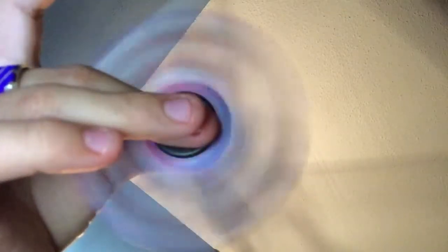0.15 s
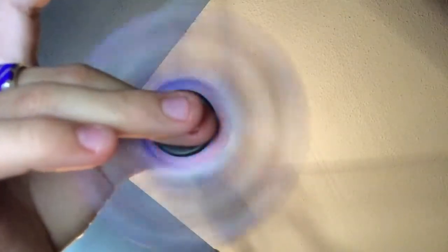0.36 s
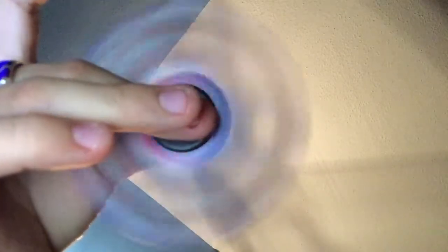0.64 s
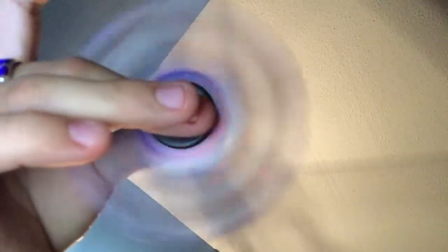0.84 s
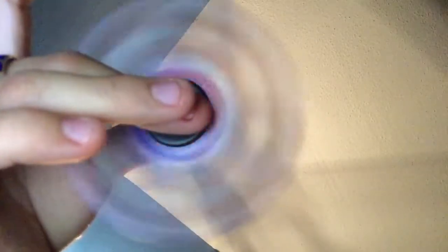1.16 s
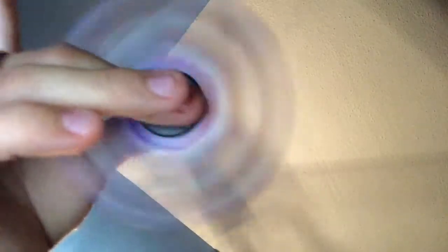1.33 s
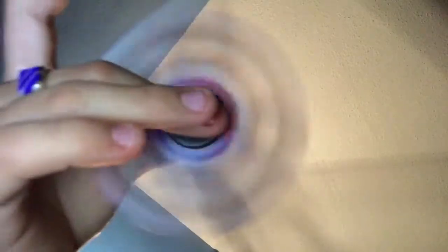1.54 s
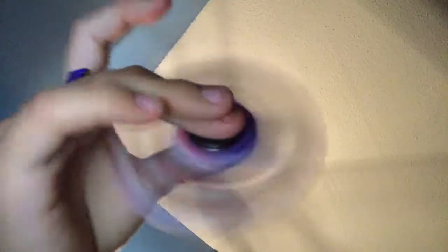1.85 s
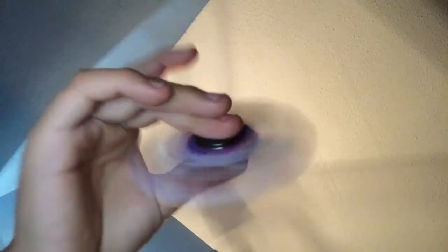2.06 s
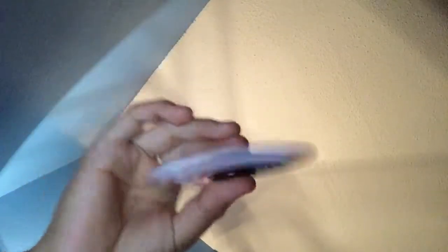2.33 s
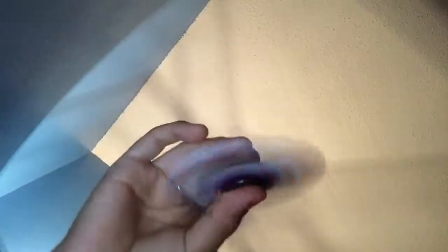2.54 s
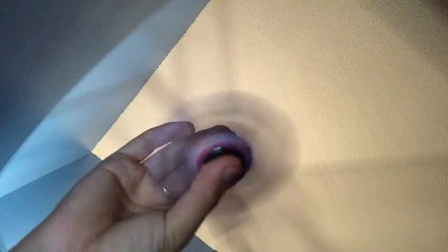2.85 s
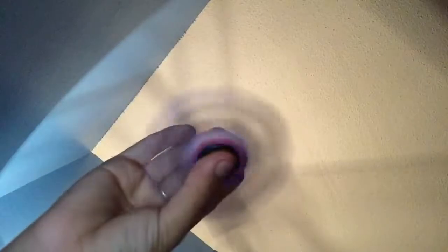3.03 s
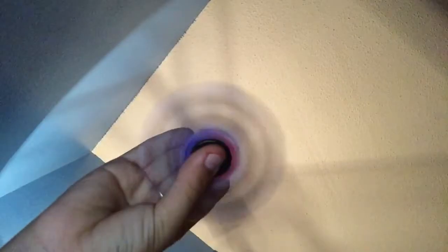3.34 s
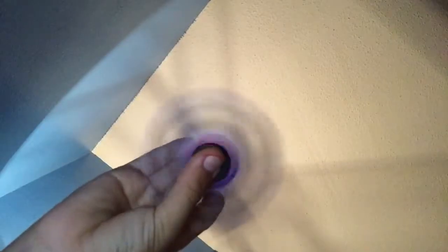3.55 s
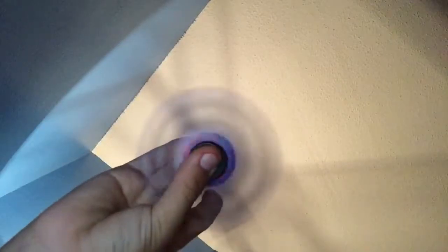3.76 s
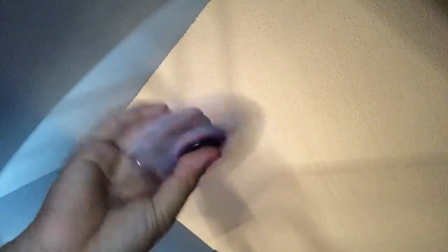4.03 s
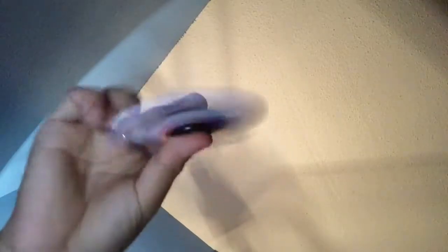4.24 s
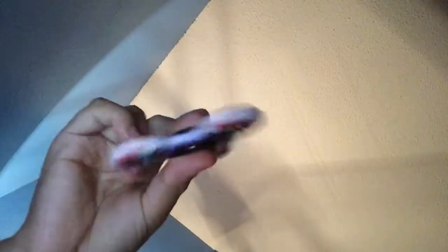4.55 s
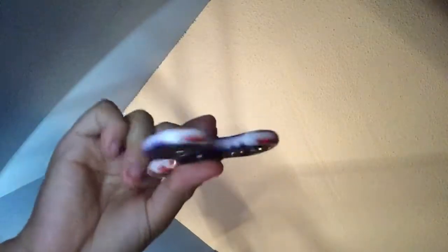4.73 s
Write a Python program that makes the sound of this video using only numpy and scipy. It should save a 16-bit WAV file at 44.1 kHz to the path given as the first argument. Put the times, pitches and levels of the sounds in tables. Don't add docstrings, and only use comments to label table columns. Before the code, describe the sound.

Close mono pickup in a quiet room. Steel balls roll in a hand-held spinner, making a steady high metallic whir full of fine crackling ticks and faint ringing tones. It weakens as the hand moves back and turns, throbbing more strongly for a moment. Finally finger contact makes quick slaps, skin scuffs and two dull little thuds; the spinning cuts out and only soft rumble and hush remain.

```python
import sys
import numpy as np
from scipy import signal
from scipy.fft import rfft, irfft, next_fast_len
from scipy.io import wavfile
from scipy.ndimage import uniform_filter1d, map_coordinates

SR = 44100
rng = np.random.default_rng(int(sys.argv[2]) if len(sys.argv) > 2 else 0)


def wrap_up_sound(samples):
    columns = np.atleast_2d(samples).T
    tamed = np.clip(columns, -1, 1)
    steps = np.round(tamed * 32767).astype(np.int16)
    wavfile.write(sys.argv[1], SR, steps)


def to_linear_factor(level_db):
    exponent = np.asarray(level_db, float) / 20
    return 10 ** exponent


N = 215499
TIME_S = np.arange(N) / SR
WANDER_HZ = 70


def spinner():
    # t/s, speed/(turns per s), throb once, twice and three times a turn (each level/dB)
    spin = [(0, 13.1, 0.35, 0.31, 1.1), (.6, 15.5, 0.45, 0.24, 0.67), (.85, 11.4, 0.33, 0.36, 2.7),
            (1.4, 13.7, 0.57, 0.25, 1.8), (1.8, 15, 0.27, 0.33, 0.83), (2.2, 12.7, 0.33, 2.4, .4),
            (2.55, 10.7, 0.38, 1.7, .4), (2.9, 13, 0.46, 0.37, 0.51), (3.55, 9.6, 0.39, 0.4, 0.76),
            (4.2, 9.3, 0.35, 0.31, 0.43), (4.75, 3.1, 0.41, 0.32, 0.46)]
    speed, once_db, twice_db, thrice_db = curves(spin)
    turn = 2 * np.pi * np.cumsum(speed) / SR
    throb_db = once_db * np.sin(turn + 0.32)
    throb_db += twice_db * np.sin(2 * turn + 0.2)
    throb_db += thrice_db * np.sin(3 * turn + 0.24)
    load_db = 0.6 * wobble(45)
    common = rolling(2500, scatter_db=4.0, smooth=0.51)
    fade = np.interp(TIME_S, [4.7, 4.76], [1, 0])

    def part(level_db, modes, mid_hz, span_hz, own, flutter_db, throb):
        own_force = rolling(2000, scatter_db=3.0, smooth=0.6)
        force = np.sqrt(1 - own) * common + np.sqrt(own) * own_force
        flutter = flutter_db * (0.27 * wobble(18) + wobble(50))
        swing = to_linear_factor(load_db + throb * throb_db + flutter)
        return to_linear_factor(level_db) * fade * unit(swing * rung(force, modes, mid_hz, span_hz))

    edge, level = levels()
    return cage(part, level) + races(part, level) + finger_cap(part, level, edge) + body(part, level)


def cage(part, level):
    # f/Hz, width/Hz, level/dB
    tones = [(5340, 920, -5.5), (5710, 320, -7), (6530, 410, -0.5)]
    # f/Hz, width/Hz, level/dB
    fine_tones = [(4965, 45, 0), (5250, 45, 1), (5572, 40, 0), (5878, 45, 1), (5980, 35, 0), (6212, 40, -3),
                  (6420, 45, 1), (6492, 40, 0), (6895, 45, 0)]
    low_db, high_db = level["cage_low"], level["cage_high"]
    low = part(low_db, tones[:1], 5350, 2200, own=0.29, flutter_db=1.0, throb=0.81)
    high = part(high_db, tones[1:], 6270, 2400, own=0.43, flutter_db=-0.8, throb=0.13)
    fine_db = (low_db + high_db) / 2 + 6.5 - 9
    fine = part(fine_db, fine_tones, 5500, 4000, own=1.0, flutter_db=-4.0, throb=0.25)
    return slid(low, WANDER_HZ * wobble(3)) + slid(high, WANDER_HZ * wobble(3)) + fine


def races(part, level):
    # f/Hz, width/Hz, level/dB
    outer_tones = [(7054, 180, -0.5), (7324, 144, -5), (7380, 320, -13.5)]
    inner_tones = [(9080, 110, 3), (9474, 180, 6.5), (9534, 270, 6), (10420, 210, -4), (10710, 110, -3.5),
                   (10970, 490, -6.5), (11520, 540, -5.5)]
    ball_tones = [(12600, 1600, -12), (15600, 380, -7)]
    # t/s, ring f/Hz, level over its usual/dB
    pitch = [(0, 7060, 4.5), (.56, 7150, -2.5), (.72, 7060, -2), (1.0, 7150, 1.5), (1.12, 7080, 0),
             (1.4, 7160, 0.5), (1.8, 7070, -0.5), (2.05, 7100, -1), (2.4, 7170, 1), (2.75, 7270, -1.5),
             (2.88, 7060, 0.5), (3.15, 7120, 3), (3.55, 7160, 0), (3.9, 7150, -0.5), (4.3, 7120, 0.5),
             (4.53, 7170, 2), (4.61, 7270, -1), (4.74, 7320, -1)]
    outer_hz, load_db = curves(pitch)
    outer = part(level["outer"] + load_db, outer_tones, 7435, 760, own=0.58, flutter_db=0.95, throb=0.4)
    inner = part(level["inner"], inner_tones, 10550, 4100, own=0.96, flutter_db=1.2, throb=0.38)
    balls = part(level["balls"], ball_tones, 16500, 8800, own=0.93, flutter_db=1.0, throb=0.45)
    return slid(outer, outer_hz - 7150) + slid(inner, WANDER_HZ * wobble(2)) + balls


def finger_cap(part, level, edge):
    # f/Hz, width/Hz, level/dB
    cap_tones = [(2009, 81, 0)]
    dull_tones = [(880, 880, 0)]
    gripped_tones = [(2450, 3900, 0)]
    # t/s, ring f/Hz, ring over the dull shake/dB
    squeeze = [(0, 1960, 2), (.2, 1930, -6), (.45, 1937, -3), (.62, 1940, -3), (.78, 1975, -2.5),
               (1.45, 1983, -0.5), (1.6, 1983, -2.5), (1.85, 1974, -1.5), (1.97, 1980, 5), (2.14, 1978, -7),
               (2.3, 1967, -8.5), (3.95, 1935, -10.5), (4.15, 1930, 1.5), (4.35, 1886, 0),
               (4.44, 1900, -14), (4.475, 1905, 5), (4.51, 1890, -9), (4.76, 1960, -9)]
    cap_hz, ring_db = curves(squeeze)
    cap_db = level["cap"]
    ring = part(cap_db + 0.75 * ring_db, cap_tones, 1765, 720, own=0.77, flutter_db=0.2, throb=0.28)
    dull_db = cap_db - 2.5 + 0.01 * ring_db - 5.0 * edge
    dull = part(dull_db, dull_tones, 1030, 2200, own=0.96, flutter_db=1.0, throb=0.37)
    regrip_db = 14 * np.exp(-((TIME_S - 4.7) / .17) ** 2)
    gripped_db = cap_db - 12 - 0.53 * ring_db + 6 * edge + regrip_db
    gripped = part(gripped_db, gripped_tones, 2390, 1400, own=1.0, flutter_db=1.5, throb=0.55)
    return slid(ring, cap_hz - 1980) + dull + gripped


def body(part, level):
    # f/Hz, width/Hz, level/dB
    arm_tones = [(3010, 580, -1), (3480, 144, 0.5), (3816, 207, 5)]
    hub_tones = [(4020, 300, -1.2), (4500, 320, 0)]
    weight_tones = [(7560, 260, -5), (8115, 110, -2), (8330, 260, -7), (8680, 230, -5)]
    arms = part(level["arms"], arm_tones, 3280, 1290, own=1.0, flutter_db=1.94, throb=0.24)
    hub = part(level["hub"], hub_tones, 4530, 1100, own=0.72, flutter_db=1.6, throb=1.44)
    weights = part(level["weights"], weight_tones, 8240, 1400, own=0.65, flutter_db=1.0, throb=0.22)
    return arms + slid(hub, WANDER_HZ * wobble(2.7)) + slid(weights, WANDER_HZ / 2 * wobble(2))


def levels():
    # t/s, nearness level/dB, how far the disc is turned edge-on (0-1), lean of the axle (-1 to 1)
    pose = [(0, 0.5, 0.3, 0.48), (.5, 1, 0.04, -0.11), (1.0, -0.5, 0.1, 0.49), (1.46, 0, 0, -0.21),
            (1.56, -3.5, 0, 0.21), (1.72, -3.5, 0.06, 0.64), (1.77, -5, 0.28, 0.26),
            (2.03, -7.5, 0.35, -0.51), (2.25, -5.5, 0.96, 0.07), (2.6, -6.5, 1.1, 0.77),
            (2.8, -8.5, 0.93, 0.7), (2.9, -7, 0.76, 1), (3.15, -8, 0.63, 0.63), (3.36, -7, 0.01, -.4),
            (3.88, -8, 0.14, -0.8), (4.18, -12, 0.44, -0.53), (4.22, -6.5, 0.77, 0.22),
            (4.45, -11.5, 0.6, 0.51)]
    # start t/s, end t/s, tightness (0-1)
    seated = [
        (0.82, 1.24, 0.75),
        (1.444, 1.718, .6),
        (3.955, 4.19, 0.37),
    ]
    # start t/s, end t/s, level/dB
    loose = [
        (1.253, 1.45, 1.5),
        (4.06, 4.47, 2),
    ]
    # t/s, level/dB
    rattles = [(.03, -1.5), (.1, -4.5), (.16, 0), (.27, 2), (.45, 0), (.69, 4), (.755, -2), (.9, 1),
               (.945, 1.5), (.785, 2.5), (1.11, -1), (1.18, -2), (1.31, 4), (1.41, 5), (1.46, 2.5),
               (1.537, 2), (1.587, 3.5), (1.62, 4), (1.7, 1.5), (1.735, 2), (2.27, 3.5), (2.56, 5),
               (2.85, 4), (2.915, -2), (3.03, -1), (3.145, -3), (3.29, 0), (3.345, 2), (3.37, 2),
               (3.44, 2.5), (3.52, 3), (3.6, 2), (3.62, 3.5), (3.68, 1), (3.705, 3.5), (3.75, 2),
               (3.855, 7), (3.9, 3), (4.235, 4.5), (4.265, 4), (4.295, 5), (4.325, 2.5), (4.35, 2.5),
               (4.38, 3), (4.41, 4.5), (4.456, 3), (4.489, 4), (4.522, 4.5), (4.548, -2), (4.578, 6),
               (4.59, 3), (4.601, 8.5), (4.622, 10), (4.65, 13), (4.663, 15), (4.68, 5), (4.715, 3)]
    # level/dB, share of nearness, edge-on/dB, lean/dB, seated/dB, share of rattle
    answers = dict(cage_low=(-53, 1, -5, 4.5, 1.5, 1.5), cage_high=(-54, 1, -2, -4.5, 3.5, -0.8),
               outer=(-49.5, 0.83, -2, -1.5, 0, 0.98), inner=(-64, 0.53, -0.5, -1, -6, 0.5),
               balls=(-70.5, 0.53, 0, 0.5, 5.5, 1.3), cap=(-67, 0.69, 0.7, -0.5, 1.2, -0.8),
               arms=(-63.5, 0.49, -1.3, 2.2, -6.5, 1.5), hub=(-61, 1, 6, -0.5, -4, 1.56),
               weights=(-65.5, 0.5, 5, 1, -1.5, -0.5))
    stops = dict(cage_low=1.7, cage_high=1.8, outer=1.35, inner=1.5, balls=1.3, cap=2, arms=2.2, hub=2.1, weights=2.3)
    settle_s = 0.025
    near_db, edge, lean = curves(pose)
    seat = np.array(seated)[:, 2] @ spells(seated, settle_s, TIME_S)
    rattle_db = swells(rattles, width_s=0.005)
    brake_db = 170 * (TIME_S - 4.553).clip(0)
    level = {}
    for name, (db, near, edge_db, lean_db, seat_db, shake) in answers.items():
        pose_db = near * near_db + edge_db * edge + lean_db * lean
        level[name] = db + pose_db + seat_db * seat + shake * rattle_db - stops[name] * brake_db
    drag_db = 25 * (TIME_S - 4.34).clip(0)
    level["balls"] += drag_db
    level["inner"] += 0.44 * drag_db
    level["arms"] -= 1.7 * drag_db
    level["arms"] += 2.5 * (1 - np.tanh((TIME_S - 0.72) / settle_s)) / 2
    level["arms"] += 3.5 * np.exp(-(TIME_S / 0.16) ** 2)
    level["inner"] += np.array(loose)[:, 2] @ spells(loose, settle_s / 2, TIME_S)
    return edge, level


def rolling(rate, scatter_db, smooth):
    chance, size, sign = rng.random((3, N))
    strength = to_linear_factor(-scatter_db * np.log(1 - size).clip(-3.5))
    knocks = (chance < rate / SR) * strength * np.sign(sign - .5)
    share = np.clip(smooth, 0, 1)
    return np.sqrt(1 - share) * unit(knocks) + np.sqrt(share) * rng.standard_normal(N)


def rung(force, modes, mid_hz, span_hz):
    def response(f):
        ring = 0
        for k, (centre, width, db) in enumerate(modes):
            tone = 1j * f * width / (centre * centre - f * f + 1j * f * width)
            ring = ring + (-1) ** k * to_linear_factor(db) * tone
        band = (1j * f * span_hz / (mid_hz ** 2 - f * f + 1j * f * span_hz)) ** 2
        return ring * band
    return unit(filtered(force, response))


def ball_knocks():
    # t/s, peak level/dB
    near_knocks = [(0.0055, -33), (0.1072, -33), (0.1615, -33), (0.1975, -33), (0.2151, -33), (0.2216, -33),
                   (0.2244, -34), (0.267, -30), (0.3183, -33), (0.3195, -35), (0.3895, -33), (0.3914, -33),
                   (0.423, -30), (0.4503, -33), (0.4736, -32), (0.5166, -30), (0.5458, -34), (0.5543, -34),
                   (0.5556, -35), (0.5574, -35), (0.6319, -34), (0.6405, -34), (0.6777, -34), (0.6798, -35),
                   (0.751, -35), (0.7561, -35), (0.7579, -31), (0.7652, -35), (0.7812, -34), (0.7948, -28),
                   (0.8087, -34), (0.826, -34), (0.8433, -34), (0.8575, -34), (0.8747, -35), (0.8836, -33),
                   (0.8849, -31), (0.9149, -33), (0.944, -30), (0.9555, -32), (0.9747, -31), (1.0161, -34),
                   (1.0186, -33), (1.0208, -34), (1.0247, -33), (1.0461, -33), (1.068, -33), (1.0723, -33),
                   (1.0798, -32), (1.0898, -32), (1.0991, -31), (1.1041, -30), (1.111, -33), (1.1123, -31),
                   (1.1493, -34), (1.1509, -32), (1.1567, -33), (1.158, -31), (1.1594, -34), (1.1661, -33)]
    far_knocks = [(1.2339, -34), (1.2369, -34), (1.2415, -34), (1.2458, -34), (1.2723, -31), (1.3009, -32),
                  (1.3042, -31), (1.3071, -33), (1.3292, -34), (1.4088, -32), (1.4102, -32), (1.4402, -32),
                  (1.4645, -31), (1.5363, -34), (1.5754, -36), (1.5872, -33), (1.6119, -35), (1.648, -36),
                  (1.6988, -35), (1.7028, -36), (1.7043, -37), (1.7122, -36), (1.7278, -37), (1.7365, -37),
                  (1.7399, -38), (1.7651, -38), (1.8402, -38), (1.8714, -38), (1.9555, -39), (1.957, -41),
                  (1.978, -41), (2.0833, -42), (2.0944, -39), (2.1082, -38), (2.1663, -41), (2.1734, -42),
                  (2.1785, -39), (2.2122, -40), (2.2536, -37), (2.2549, -39), (2.2637, -39), (2.3087, -40),
                  (2.342, -40), (2.3653, -41), (2.368, -38), (2.4024, -40), (2.4382, -41), (2.4473, -39),
                  (2.5428, -40), (2.5475, -39), (2.6076, -40), (2.6147, -41), (2.65, -40), (2.6588, -41),
                  (2.7351, -43), (2.7395, -43), (2.7406, -43), (2.7451, -43), (2.8417, -42), (2.8468, -42)]
    last_knocks = [(2.9104, -40), (2.9144, -40), (2.9167, -41), (2.9225, -41), (2.9266, -42), (2.9559, -40),
                   (2.9997, -40), (3.0327, -40), (3.0341, -40), (3.1343, -42), (3.136, -42), (3.1376, -40),
                   (3.1432, -39), (3.1466, -38), (3.1488, -42), (3.1591, -40), (3.2224, -41), (3.2241, -41),
                   (3.2291, -41), (3.2332, -41), (3.2651, -41), (3.27, -41), (3.2796, -39), (3.3413, -37),
                   (3.3516, -40), (3.3671, -37), (3.3881, -39), (3.5203, -39), (3.5891, -40), (3.6174, -39),
                   (3.7404, -40), (3.746, -40), (3.7479, -41), (3.8276, -41), (3.829, -40), (3.8927, -41),
                   (3.8941, -41), (3.8956, -41), (3.9023, -41), (3.9101, -41), (3.9142, -41), (4.0234, -41),
                   (4.1767, -43), (4.2217, -38), (4.2238, -43), (4.2306, -39), (4.234, -39), (4.2371, -42),
                   (4.2638, -39), (4.2945, -40), (4.2967, -40), (4.2993, -38), (4.3084, -42), (4.3464, -42),
                   (4.3491, -43), (4.3518, -43), (4.4135, -42), (4.4218, -43), (4.4538, -43), (4.459, -43)]
    width_s = .00019
    out = np.zeros(N + SR)
    t = np.arange(SR // 100) / SR
    u = t - 4 * width_s
    for s, db in near_knocks + far_knocks + last_knocks:
        hz = rng.normal(6000, 250)
        ring = np.cos(2 * np.pi * hz * u) * np.exp(-.5 * (u / width_s) ** 2)
        out[round((s - 4 * width_s) * SR):][:len(t)] += to_linear_factor(db - 2) * ring
    return out[:N]


def arm_brushes():
    # t/s, peak level/dB, colour f/Hz, bright edge against the peak/dB
    brushes = [(4.4945, -33, 5200, -23), (4.5286, -40, 4900, -21), (4.5676, -48, 6000, -8),
               (4.578, -49, 5500, -10), (4.5475, -50, 5000, -16), (4.5605, -51, 5200, -14),
               (4.5905, -54, 4600, -14), (4.6005, -51, 5400, -12), (4.6231, -54, 5600, -4),
               (4.6505, -64, 7200, 3), (4.6629, -60, 6000, -13), (4.6968, -65, 7200, -8),
               (4.7144, -63, 6600, 4)]
    out = np.zeros(N + SR)
    t = np.arange(SR // 100) / SR
    for s, db, hz, edge_db in brushes:
        ring = pulse(t, hz, .00015)
        edge = pulse(t, 13500, .0001)
        out[round(s * SR) - 7:][:len(t)] += to_linear_factor(db) * (ring + to_linear_factor(edge_db) * edge)
        hiss = unit(np.diff(rng.standard_normal(len(t) + 1)))
        scuff = hiss * to_linear_factor(-60 * t / 0.012) * np.sin(np.pi * t / t[-1])
        out[round(s * SR) - 60:][:len(t)] += to_linear_factor(db + edge_db + 2) * scuff
    return out[:N]


def thuds():
    # t/s, level/dB
    pushes = [
        (4.567, -50),
        (4.621, -54),
    ]
    click_s = .0003
    out = np.zeros(N + SR)
    t = np.arange(SR // 10) / SR
    for s, db in pushes:
        push = to_linear_factor(3 - 60 * t / .03) * np.sin(2 * np.pi * 240 * t)
        dull_noise = signal.lfilter(*signal.butter(2, 420, fs=SR), rng.standard_normal(len(t)))
        rub = to_linear_factor(-9.5 - 60 * t / 0.14) * unit(dull_noise)
        out[round(s * SR):][:len(t)] += to_linear_factor(db) * (push + rub) * (1 - np.exp(-t / 0.00047))
        out[round((s - 2 * click_s) * SR):][:len(t)] += to_linear_factor(db - 9) * pulse(t, 2500, click_s)
    return out[:N]


def near_echoes(x, patchy_db):
    # start t/s, end t/s, first delay/ms, last delay/ms, strength
    mirrors = [(0, .2, 1.19, 1.19, .15), (.2, .6, .545, .545, .1), (.2, .6, 1.06, 1.055, -.12),
               (.2, .6, 1.455, 1.46, .12), (.6, 1.2, .83, .82, .13), (.8, 1.2, .6, .59, .13),
               (.8, 1.2, 1.7, 1.7, -.12), (1.6, 2.2, 1.37, 1.37, -.12), (1.8, 2.6, 1.188, 1.188, .16),
               (3.0, 3.6, 1.185, 1.19, .16), (1.7, 3.2, 1.825, 1.74, .19), (3.2, 4.2, 1.72, 1.69, .12),
               (2.6, 3.4, .41, .415, .13), (3.2, 3.6, .76, .755, .07), (2.8, 3.8, 1.5, 1.455, -.13),
               (4.0, 4.6, .948, .955, -.13), (4.2, 4.6, 1.205, 1.185, .13)]
    hz, t, z = signal.stft(x, SR, nperseg=512, noverlap=384)
    comb = np.ones(z.shape, complex)
    for facing, (start, end, first_ms, last_ms, strength) in zip(spells(mirrors, .1, t), mirrors):
        delay = np.interp(t, [start, end], [first_ms, last_ms]) / 1000
        on = facing > 1e-3
        comb[:, on] += strength * facing[on] * np.exp(-2j * np.pi * hz[:, None] * delay[on])
    streaks = uniform_filter1d(rng.standard_normal(z.shape), size=2, axis=0)
    streaks = uniform_filter1d(streaks, size=26, axis=1)
    streaks = streaks - uniform_filter1d(streaks, size=9, axis=0)
    echoed = z * comb * to_linear_factor(patchy_db * unit(streaks))
    return signal.istft(echoed, SR, nperseg=512, noverlap=384)[1][:N]


def room():
    # f/Hz, level/dB per Hz
    low = [(12, -58), (20, -50), (49, -1), (85, -3), (108, 2), (140, -5), (220, -27), (400, -120)]
    upper = [(110, -120), (150, 0), (200, -3), (330, -8.5), (430, -10), (730, -120)]
    air = [(120, -21.5), (200, -4.5), (438, -18), (587, -16.5), (1090, -22.5), (1410, -20), (2070, -26),
           (2700, -27.5), (6500, -30), (15700, -34.5)]
    # t/s, level over the rumble/dB
    bumps = [(0.09, 2), (0.22, 5), (0.29, 4), (0.4, 5), (0.52, 6), (0.61, 7), (0.72, 4.5), (0.86, 10),
             (0.91, 2.5), (1.1, 8), (1.27, 7), (1.66, 13.5), (1.82, 7), (1.97, 9), (2.32, 6), (2.5, 4),
             (2.6, 13), (2.82, 5), (3.02, 6), (3.18, 4), (3.23, 1), (3.32, 6), (3.4, 2), (3.55, 3),
             (3.74, 9), (3.88, 3.5), (4.01, 10.5), (4.1, 10), (4.23, 9), (4.28, 5), (4.36, 1), (4.44, 6),
             (4.58, 4.5), (4.77, 5)]
    # t/s, level over their murmur/dB
    taps = [(.17, 0), (.78, 8), (1.05, 3.5), (1.81, -1), (2.11, 11.5), (2.16, 9), (2.24, 10), (2.32, 9),
            (2.59, 8.5), (2.68, 9), (3.12, 4), (3.18, 1), (3.31, 6), (3.79, 8.5), (4.08, 8)]
    lumps = to_linear_factor(1.3 * wobble(24.83))
    rumble = to_linear_factor(-65 + 1.08 * swells(bumps, width_s=0.021)) * unit(lumps * coloured(low))
    murmur = to_linear_factor(-76 + 1.3 * swells(taps, width_s=0.014) + 1.6 * wobble(20)) * coloured(upper)
    hush = to_linear_factor(-69 + 0.46 * wobble(4.39)) * coloured(air)
    return rumble + murmur + hush


def unit(x):
    return x / np.sqrt(np.mean(x ** 2) + 1e-20)


def pulse(t, hz, peak_s):
    return np.sin(2 * np.pi * hz * t) * (t / peak_s) * np.exp(1 - t / peak_s)


def curves(rows):
    s, *cols = np.transpose(rows)
    return [np.interp(TIME_S, s, c) for c in cols]


def wobble(rate):
    points = rng.standard_normal(int(N * rate / SR) + 4)
    return map_coordinates(points, [np.arange(N) * rate / SR])


def spells(rows, edge_s, t):
    start, end = np.array(rows)[:, :2, None].transpose(1, 0, 2)
    return (np.tanh((t - start) / edge_s) - np.tanh((t - end) / edge_s)) / 2


def swells(rows, width_s):
    t = np.arange(0, N, 32) / SR
    s, db = np.transpose(rows)[..., None]
    bells = db * np.exp(-.5 * ((t - s) / width_s) ** 2)
    return np.interp(TIME_S, t, np.max(bells, axis=0))


def filtered(x, response):
    m = next_fast_len(N + SR // 4)
    return irfft(rfft(x, m) * response(np.fft.rfftfreq(m, 1 / SR)), m)[:N]


def coloured(spectrum):
    f, level_db = np.transpose(spectrum)

    def response(hz):
        return to_linear_factor(np.interp(np.log(hz + 1), np.log(f + 1), level_db))
    return unit(filtered(rng.standard_normal(N), response))


def slid(x, by_hz):
    spiral = signal.hilbert(x, next_fast_len(N))[:N]
    return np.real(spiral * np.exp(2j * np.pi * np.cumsum(by_hz) / SR))


def scene():
    whir = near_echoes(spinner(), patchy_db=2.0)
    return np.tile(whir + ball_knocks() + arm_brushes() + thuds() + room(), (2, 1))


def roll_off(x):
    return signal.sosfilt(signal.butter(12, 16620, fs=SR, output="sos"), x)


def record(dry):
    heard = filtered(dry[0], lambda hz: hz < 15730)
    return roll_off(np.tile(heard, (2, 1)))


dry = scene()
out = record(dry)
wrap_up_sound(out)
```